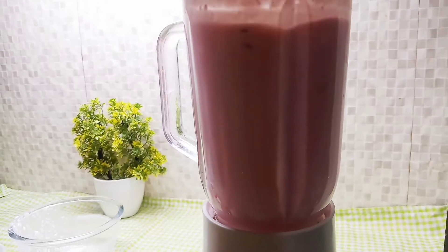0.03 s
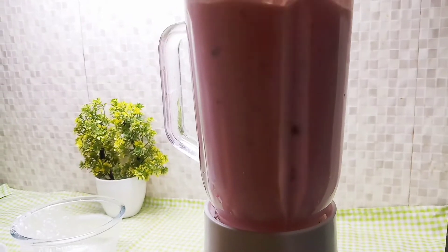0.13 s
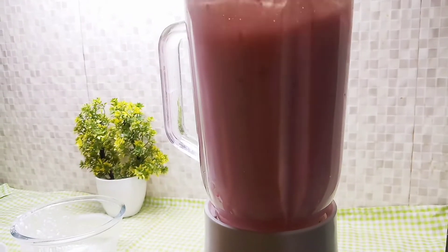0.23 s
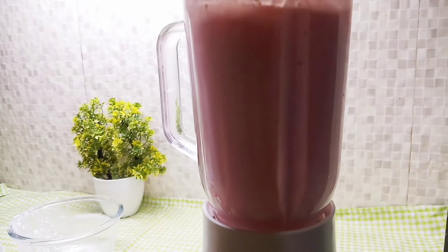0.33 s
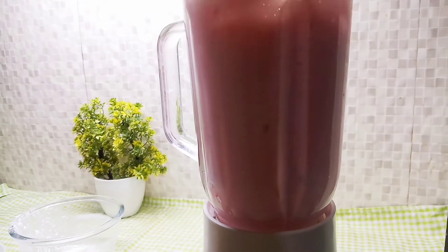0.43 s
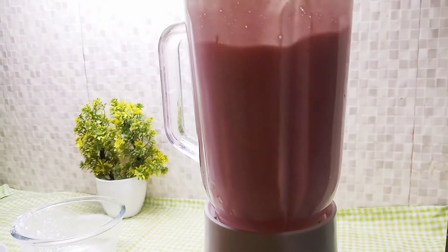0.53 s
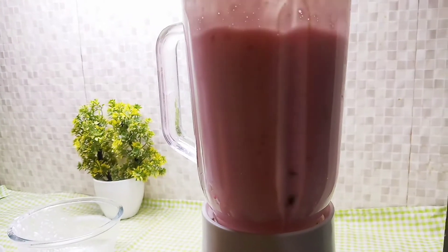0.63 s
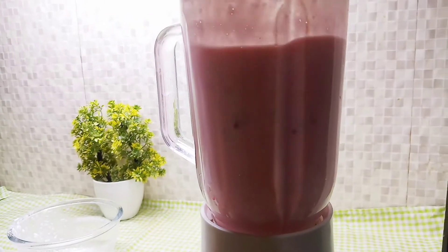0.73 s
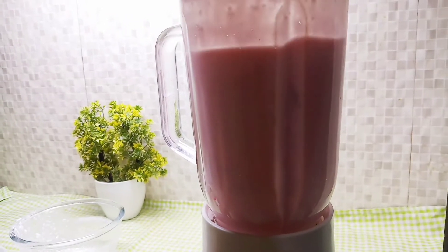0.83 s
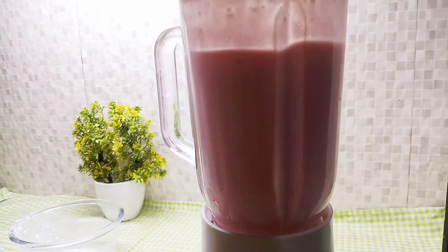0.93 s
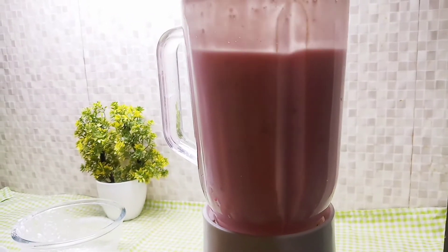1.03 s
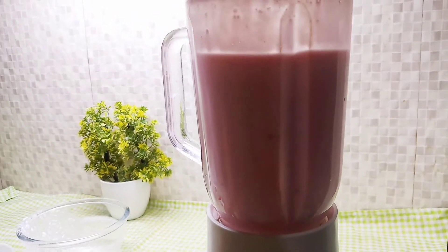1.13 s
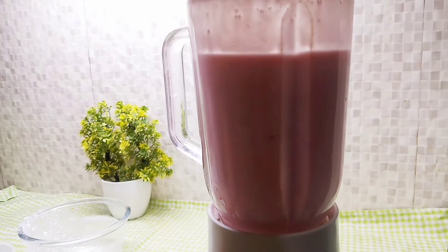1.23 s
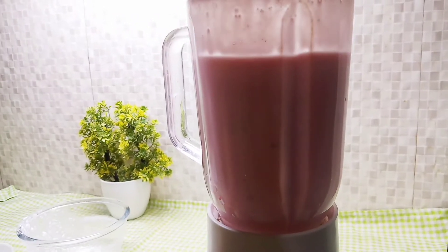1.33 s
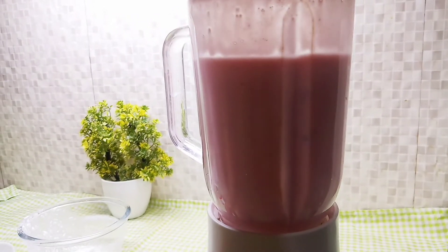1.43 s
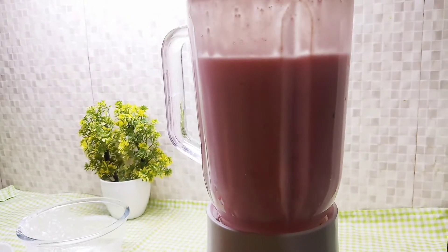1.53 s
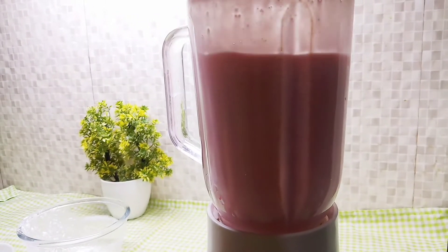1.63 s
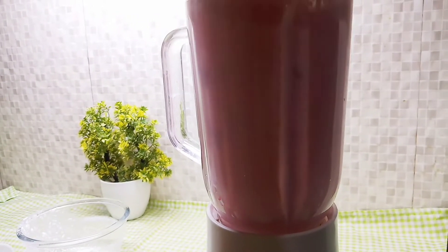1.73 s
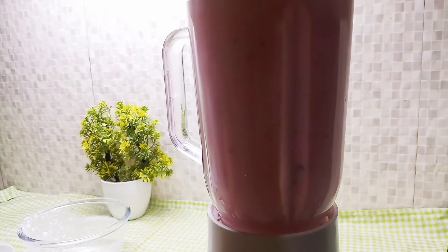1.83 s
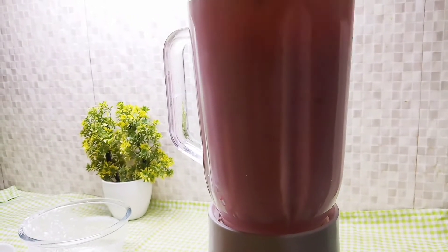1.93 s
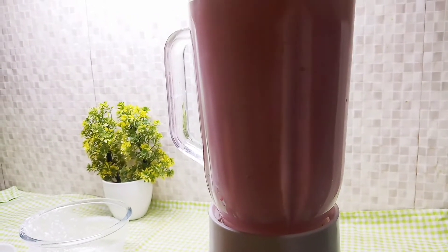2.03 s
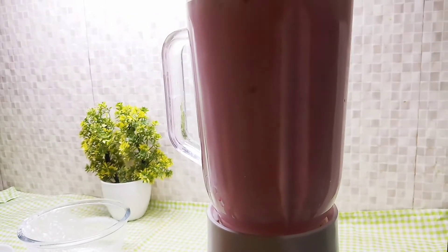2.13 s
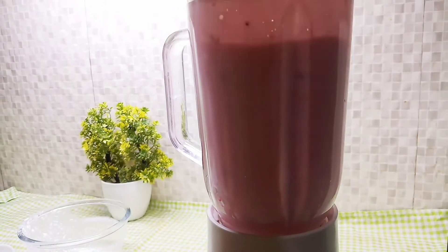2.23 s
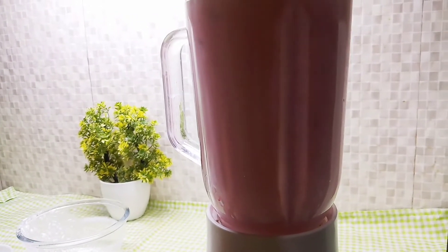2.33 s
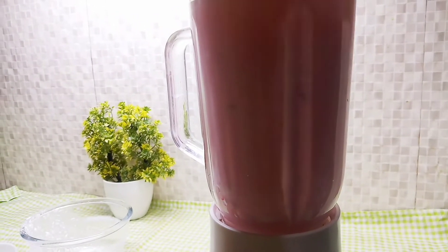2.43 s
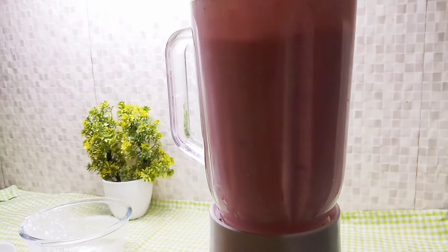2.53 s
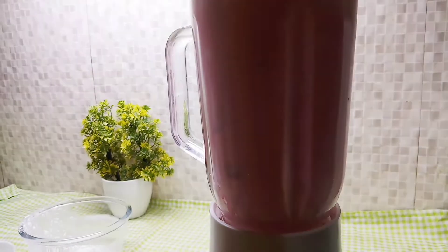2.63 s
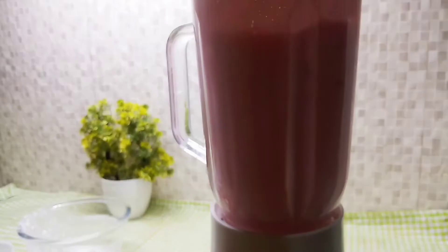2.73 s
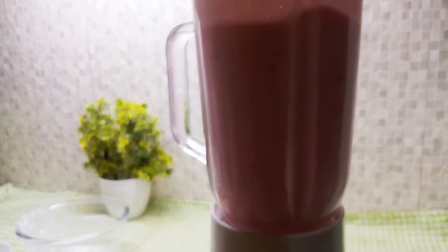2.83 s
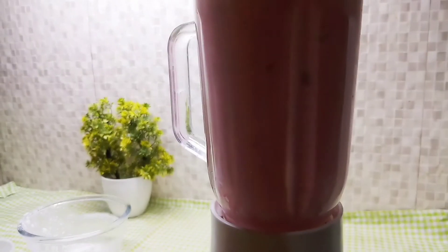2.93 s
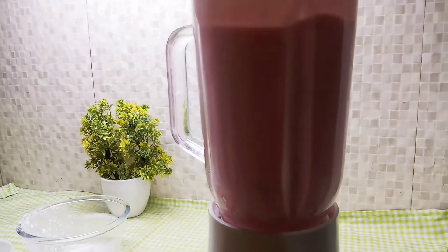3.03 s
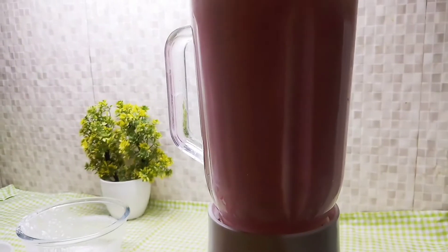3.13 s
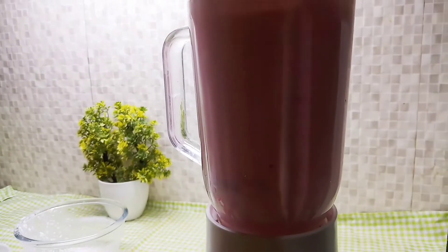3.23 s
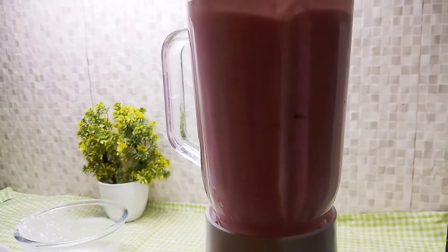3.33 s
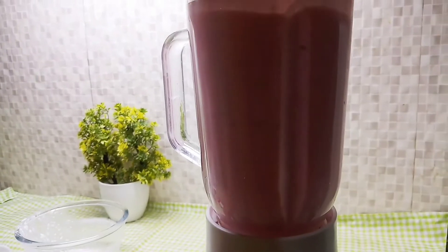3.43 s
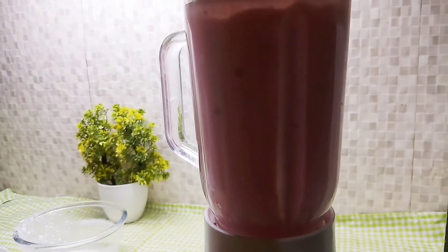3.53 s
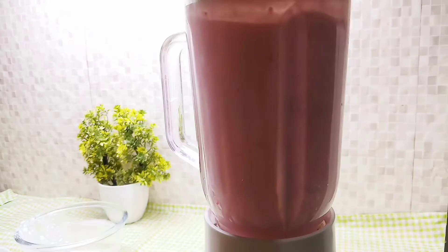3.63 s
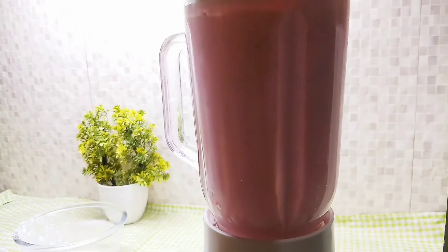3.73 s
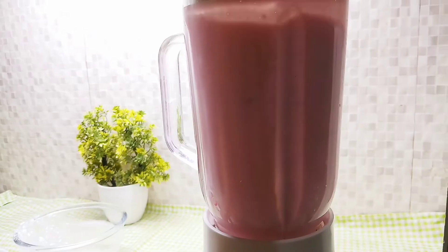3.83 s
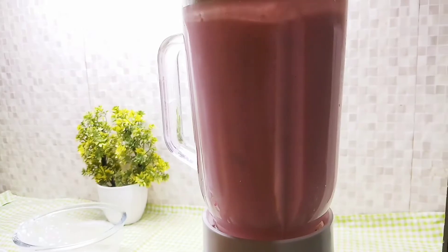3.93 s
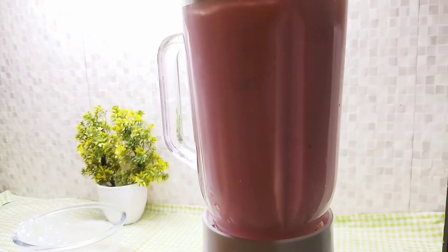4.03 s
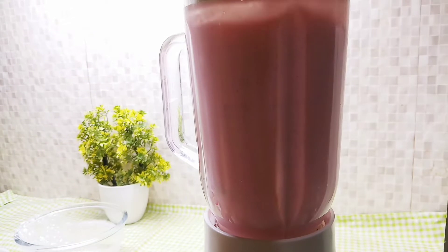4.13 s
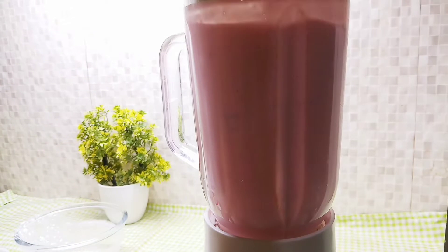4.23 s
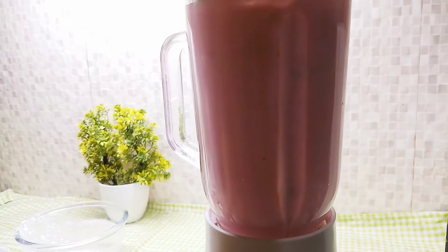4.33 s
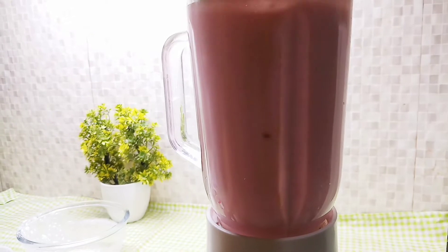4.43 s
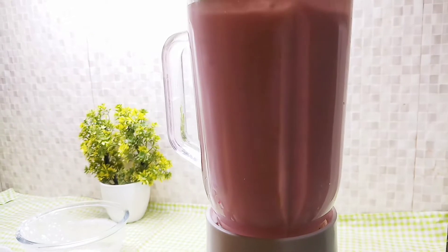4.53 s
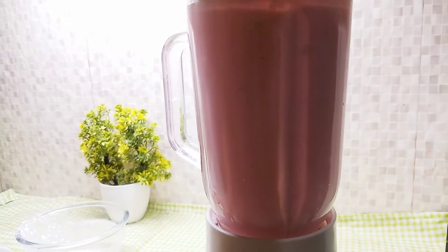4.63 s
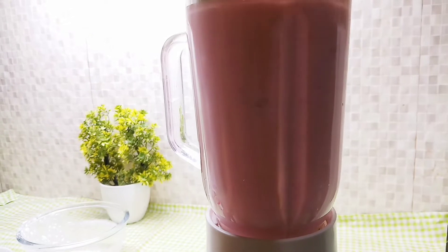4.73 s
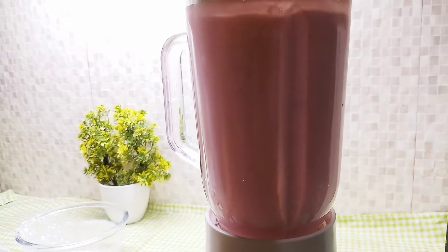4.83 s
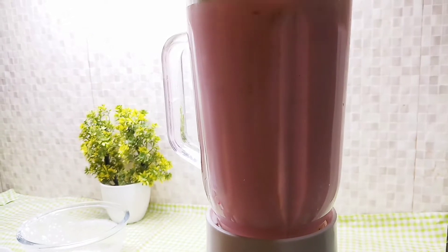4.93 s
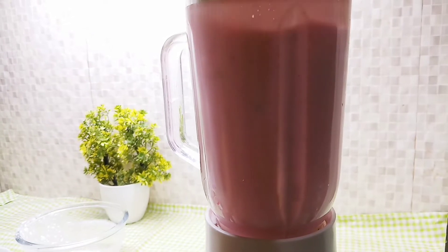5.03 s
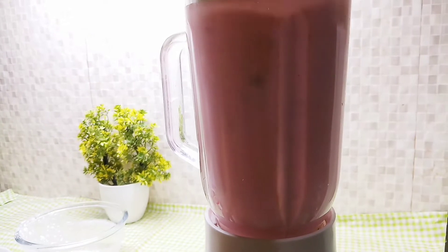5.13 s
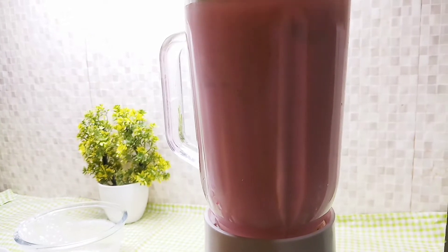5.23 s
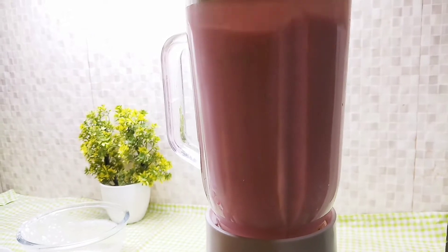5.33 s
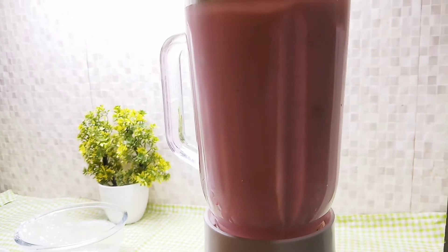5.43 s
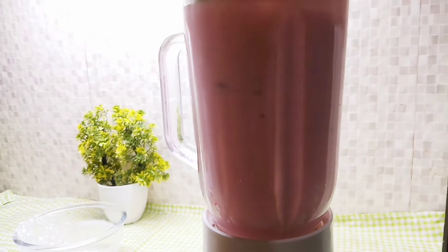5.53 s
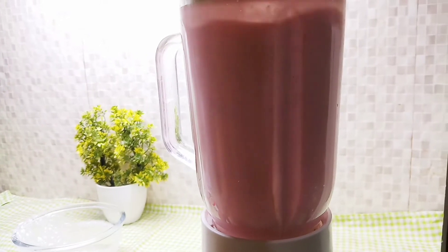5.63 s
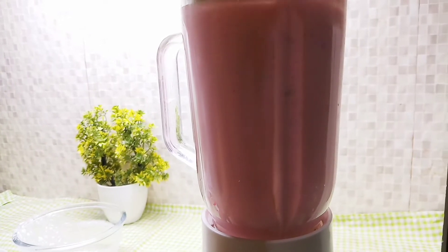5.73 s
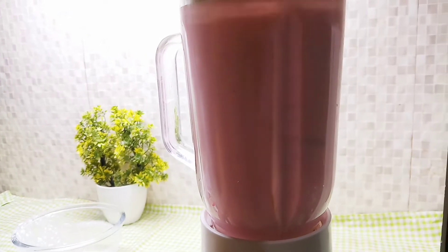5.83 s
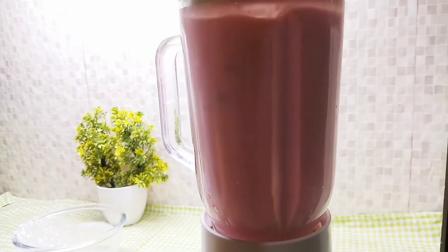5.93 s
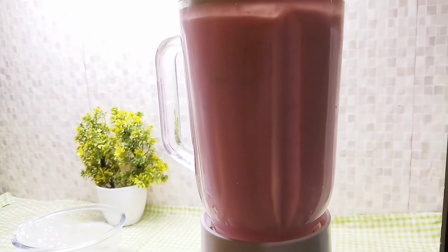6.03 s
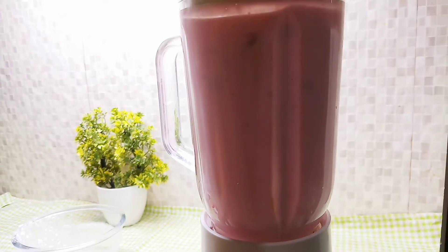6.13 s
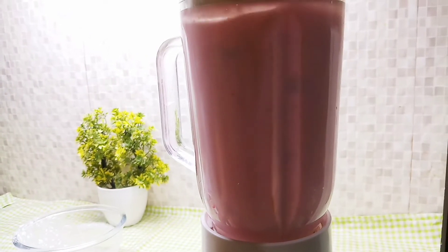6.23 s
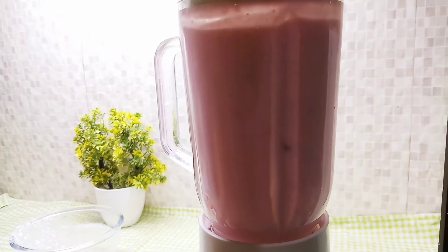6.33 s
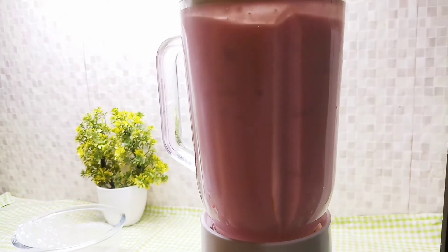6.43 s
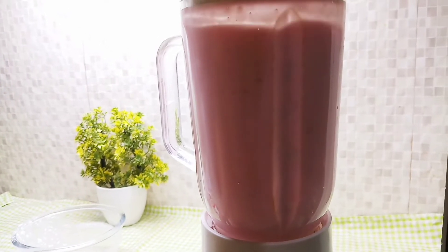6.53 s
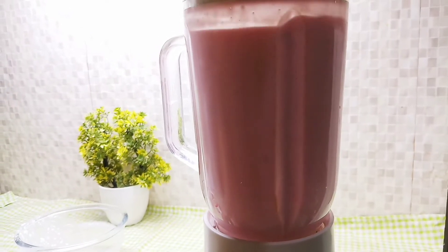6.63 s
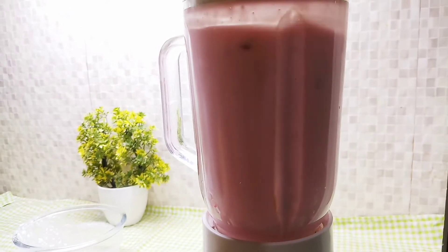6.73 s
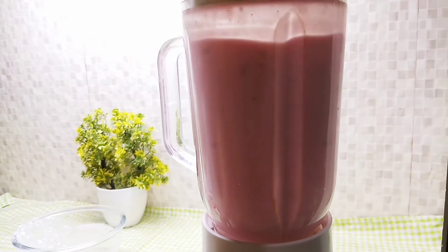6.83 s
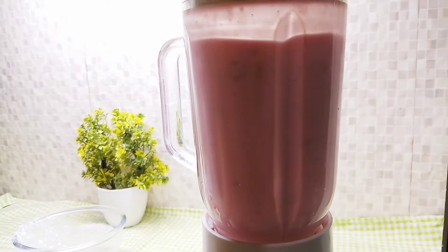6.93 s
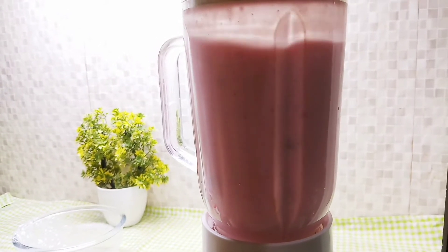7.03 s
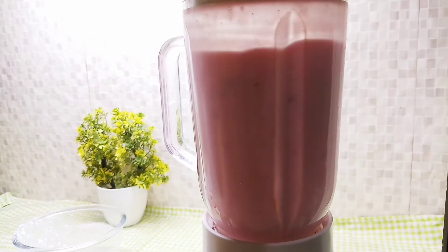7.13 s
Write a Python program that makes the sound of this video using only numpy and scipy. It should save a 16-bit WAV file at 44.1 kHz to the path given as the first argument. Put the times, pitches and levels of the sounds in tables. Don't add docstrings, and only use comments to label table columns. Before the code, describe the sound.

A blender with thick icy mix, heard at close range with short tile echo. Fading slush and knocking ice, small ticks from the slowing drive, then near quiet. A sudden restart heaves the mix, big lumps crack, the motor climbs to a steady whine under dense, gritty roar. Finally power cuts, the whirr sinks and loose ice snaps and rocks the base.

```python
import sys
import numpy as np
from scipy import signal
from scipy.fft import rfft, irfft, next_fast_len
from scipy.io import wavfile

SR = 44100
rng = np.random.default_rng(int(sys.argv[2]) if len(sys.argv) > 2 else 0)


def how_loud(loudness_db):
    steps = np.asarray(loudness_db, float) / 20
    return 10 ** steps


def store_wav(level_fs):
    pcm = np.round(np.clip(np.atleast_2d(level_fs), -1, 1) * 32767)
    wavfile.write(sys.argv[1], SR, pcm.T.astype(np.int16))


N = 316197


def rms_one(x):
    return x / np.sqrt(np.mean(x ** 2) + 1e-20)


def in_time(rows, outside=None):
    s, *columns = np.transpose(rows)
    return [np.interp(np.arange(N) / SR, s, c, outside, outside) for c in columns]


def drift(rate_hz):
    r = np.exp(-2 * np.pi * rate_hz / SR)
    wander = signal.lfilter([1], [1, -2 * r, r * r], rng.standard_normal(N + SR))
    return rms_one(wander[SR:])


def coloured(spectrum, modes=()):
    hz, level_db = np.transpose(spectrum)
    grid = np.maximum(np.arange(4097) * SR / 8192, 1)
    shape_db = np.interp(np.log(grid), np.log(hz), level_db)
    for mode_hz, width_hz, lift_db in modes:
        shape_db = shape_db + lift_db / (1 + (2 * (grid - mode_hz) / width_hz) ** 2)
    cepstrum = irfft(shape_db * np.log(10) / 20)
    cepstrum[1:4096] *= 2
    cepstrum[4097:] = 0
    return irfft(np.exp(rfft(cepstrum)))


def resonant(x, modes, plain_db):
    out = how_loud(plain_db) * x
    for k, (hz, width_hz, level_db) in enumerate(modes):
        r = np.exp(-np.pi * width_hz / SR)
        b = (1 - r * r) / 2 * np.array([1, 0, -1])
        a = [1, -2 * r * np.cos(2 * np.pi * hz / SR), r * r]
        out = out + (-1) ** k * how_loud(level_db) * signal.lfilter(b, a, x)
    return out


def rung_noise(modes):
    once = resonant(rng.standard_normal(N), modes, plain_db=-90)
    return rms_one(resonant(once, modes, plain_db=-90))


# from_hz, to_hz
RANGES_HZ = [
    (25, 400),
    (400, 1500),
    (1500, 8500),
    (8500, 19000),
]


def band(x, k):
    return signal.sosfilt(signal.butter(3, RANGES_HZ[k], "band", fs=SR, output="sos"), x)


# pitch_hz, width_hz, lift_db
JAR_MODES = [(102, 28, 0.5), (145, 14, 5.5), (229, 22, 4), (348, 39, 9.5), (707.4, 114, 10), (881, 23, 9),
             (1146, 140, 6), (1933, 125, 10.5), (2770, 100, 7), (3183, 125, 6.5), (4370, 410, 6),
             (4946, 213, 8.5), (5273, 89, 10), (5470, 59, 9), (5820, 113, 9), (6060, 110, 8),
             (7070, 250, 6.5), (7980, 240, 5), (8580, 120, -5.5), (10120, 360, 5.5)]


def jar(forces, spectrum, ring):
    detune = 0.0092
    lower = coloured(spectrum, np.array(JAR_MODES) * [1 - detune, 1, ring])
    higher = coloured(spectrum, np.array(JAR_MODES) * [1 + detune, 1, ring])
    white = rng.standard_normal((2, N))
    drive = np.zeros(N)
    for k, force in enumerate(forces):
        drive += force * band(white[k % 2], k) / np.linalg.norm(band(lower, k))
    lean = np.pi / 4 * (1 + np.tanh(drift(2.65)))
    low_ring = signal.fftconvolve(drive * np.cos(lean), lower)
    high_ring = signal.fftconvolve(drive * np.sin(lean), higher)
    return (low_ring + high_ring)[:N]


def chips(per_s, spread_db, t60):
    sizes = how_loud(spread_db * np.minimum(rng.exponential(1, N), 3))
    struck = rng.random(N) < per_s / SR
    return rms_one(signal.lfilter([1], [1, -how_loud(-60 / (t60 * SR))], sizes * struck))


FULL_CHURN_DB = -20


def follower(churn_db, full_db, below, above, heave_db, shudder_db):
    heave, = in_time([(1.265, 0), (1.28, 1), (1.593, 1), (1.623, 0)])
    shudder = np.exp(-((np.arange(N) / SR - 6.75) / 0.34) ** 2)
    excess_db = churn_db - FULL_CHURN_DB
    follow_db = np.where(excess_db < 0, below, above) * excess_db
    return full_db + follow_db + heave_db * heave + shudder_db * shudder


# time_s, level_db
CHURN = [(0, -33), (.51, -49.5), (.754, -52), (1.0, -68), (1.266, -76), (1.275, -31), (1.34, -22.5),
         (1.4, -17), (1.47, -16.5), (1.514, -21.5), (1.6, -17.5), (1.64, -20), (1.77, -19), (5.66, -16.5),
         (5.86, -15), (5.96, -18.5), (6.484, -29.5), (7.17, -42.5)]
# full_churn_db, db_per_db_below, db_per_db_above, heave_db, shudder_db
RUMBLE = (-41, 0.7, -0.05, 12, 10.5)
SLOSH = (-28.5, 0.84, 0, -1, 1.5)
SPRAY = (-30.5, 1.3, 0.62, -3, -8)
# pitch_hz, level_db (per Hz)
POWERED_COLOUR = [(30, -37), (100, -10), (200, -13.5), (470, -8.5), (1400, -5.5), (2100, -5.5),
                  (3700, -8.5), (5400, -2), (6200, -4), (6500, -8), (8800, -15.5), (9400, -24),
                  (12000, -31.5), (16500, -43)]
COASTING_COLOUR = [(30, -33), (100, -6.5), (300, -9), (470, -11), (1400, -8.5), (2100, -9.5), (5400, -5),
                   (8800, -13.5), (9400, -31), (16500, -36)]


def slush():
    scour_db, = in_time(CHURN)
    rumble_db, slosh_db, spray_db = (follower(scour_db, *layer) for layer in (RUMBLE, SLOSH, SPRAY))
    hail = chips(per_s=220, spread_db=5.5, t60=0.012)
    splinters = chips(per_s=80, spread_db=3.5, t60=0.012)
    slowing, = in_time([(1.26, 1.5), (1.28, 2.06), (5.9, 0.23), (6.4, 2)])
    splinters = splinters * slowing
    surge = drift(6.5)
    rumble = how_loud(rumble_db + 0.44 * drift(13))
    slosh = how_loud(slosh_db + 0.2 * surge + 1.7 * drift(6.1)) * (0.79 + 0.074 * hail)
    scour = how_loud(scour_db + 0.52 * surge) * (0.62 + 0.11 * hail + 0.042 * splinters)
    spray = how_loud(spray_db + surge / 2) * (0.71 + 0.12 * hail + 0.27 * splinters)
    forces = np.array([rumble, slosh, scour, spray])
    driven, = in_time([(1.26, 0), (1.27, 1), (6.0, 1), (6.5, 0)])
    powered = jar(forces * np.sqrt(driven), POWERED_COLOUR, ring=0.91)
    coasting = jar(forces * np.sqrt(1 - driven), COASTING_COLOUR, ring=0.45)
    return powered + coasting


# pitch_hz, width_hz, level_db
ROCKING_MODE = (147.5, 22, 0)


def rocking():
    coasting, = in_time([(.98, 1), (1.08, .2), (1.28, 0), (6.2, 0), (6.4, 1)])
    churn_db, = in_time(CHURN)
    sway = rung_noise([ROCKING_MODE])
    level_db = -49 + 0.5 * (churn_db - FULL_CHURN_DB) + 3.4 * drift(5)
    return coasting * how_loud(level_db) * sway


# start_s, peak_db, low_part_db, high_part_db
COAST_LUMPS = [(0.0308, -13.5, -19, -44), (0.052, -23, -6, -17), (0.122, -10, -14, -25.5),
               (0.163, -22, -19, -25), (0.2003, -15.5, -12, -23), (0.24, -24, -15, -32),
               (0.261, -21, -13, -21.5), (0.2924, -14.5, -15, -28), (0.359, -23, -13, -21),
               (0.399, -26.5, -4.5, -24), (0.4273, -25.5, -7, -38), (0.4843, -49, -16, -27),
               (0.526, -15, -13.5, -22), (0.5511, -18, -13, -24), (0.61, -27, -6, -24),
               (0.6567, -16, -14.5, -26), (0.7026, -26, -6, -19), (0.7615, -34, -25, -19),
               (0.815, -44, -24, -9), (0.85, -42, -15, -12), (0.9134, -28.5, -12.5, -29),
               (0.941, -35, -22, -35), (1.064, -50, -30, -34), (1.101, -52, -23, -39),
               (1.1598, -40, -42, -36), (1.196, -50, -32, -32), (1.216, -40, -43, -34),
               (1.27, -25, -16, -22)]
LAST_LUMPS = [(6, -5, -14, -23), (6.0625, 3, -19.5, -23.5), (6.164, -10, -8, -34), (6.223, -7.5, -13, -33),
              (6.2888, -10, -41, -22), (6.3475, -5.5, -18.5, -27), (6.39, -15, -2.5, -31),
              (6.449, -11.5, -9, -35), (6.468, -10.5, -9.5, -22), (6.509, -6.5, -24, -27),
              (6.549, -14, -14, -32), (6.579, -27, -23, -36), (6.608, -16, -21, -30),
              (6.6206, -8.5, -32, -37), (6.6394, -11.5, -10, -35), (6.6883, -15, -30, -26),
              (6.7226, -19, -11, -34), (6.753, -16, -26, -32), (6.7799, -16, -30, -39.5),
              (6.841, -12.5, -19, -34), (6.8558, -9, -21, -36), (6.8745, -9.5, -9, -31),
              (6.929, -19.5, -11, -36), (6.965, -22, -13, -39), (7.0285, -26, -28, -42),
              (7.0613, -43, -13, -44), (7.0885, -37, -21, -39), (7.1052, -13, -7.5, -48)]
# start_s, peak_db, low_part_db
START_LUMPS = [(1.273, -31, -18), (1.2894, -11.5, -8), (1.304, -6, -11), (1.3313, -6, -12),
               (1.363, -0.5, -14), (1.406, -3, -6.5), (1.448, -1.5, -12), (1.476, 1.5, -15),
               (1.504, 1, -32), (1.5293, 1, -14), (1.642, -1, -17), (1.6669, -5, -27), (1.687, 0, -27),
               (1.7178, 2, -17), (1.747, 3, -13), (1.854, 0, -18), (2.05, 2, -17), (2.0746, 5.5, -16.5),
               (2.11, 1, -14), (2.2656, 3.5, -19.5), (2.351, -0.5, -14), (2.374, 3, -18), (2.537, -1, -21)]
RUN_LUMPS = [(2.6567, 2.5, -13.5), (2.752, 5, -17), (2.794, 1, -13.5), (2.866, 2.5, -37), (2.896, 5, -18),
             (3.028, 4.5, -25), (3.0845, 1, -29), (3.1097, 6.5, -19), (3.215, 4.5, -40), (3.405, -2, -14),
             (3.597, 1.5, -36), (3.627, -1, -27), (3.748, 4.5, -20), (3.813, -1, -19), (3.95, -2, -28),
             (4.087, -13, -36), (4.1054, 2.5, -42), (4.209, 2, -35), (4.2342, 3, -13.5), (4.393, -4, -12),
             (4.688, 4.5, -11), (5.08, 7, -29), (5.2006, -10, -29), (5.2183, 1, -24), (5.239, -13, -25),
             (5.2952, -3, -30), (5.5177, -8, -29), (5.602, 3.5, -8.5), (5.7124, -8.5, -1),
             (5.7754, 0.5, -16)]
BRITTLE_S = [1.3032, 1.4047, 1.6669, 1.688, 2.752, 2.7944, 3.747, 3.95, 4.3944, 4.689]
# start_s, peak_db
COAST_PIECES = [(.0196, -21), (.1088, -24), (.1934, -23), (.2785, -18), (.3094, -22), (.371, -19),
                (.414, -27), (.436, -28), (.4464, -28), (.514, -29), (.5374, -21), (.558, -23), (.671, -23),
                (.687, -28), (.86, -42), (.9797, -48), (6.285, -11), (6.2944, -9), (6.408, -13),
                (6.4234, -17), (6.476, -13), (6.521, -14), (6.535, -17), (6.564, -16), (6.5917, -20),
                (6.6544, -18), (6.6983, -13), (6.7414, -21), (6.76, -19), (6.7944, -23), (6.8621, -16),
                (6.88, -16)]
START_PIECES = [(1.3184, -5), (1.344, -6), (1.3724, -3), (1.383, -1), (1.3924, -8), (1.4154, -5),
                (1.4214, -5), (1.4424, -6), (1.464, -4), (1.487, 0), (1.5378, 1), (1.555, -2),
                (1.5754, -1.5), (1.5984, -1), (1.6094, -12)]
RUN_PIECES = [(1.833, 6), (2.2114, -14), (2.2444, -7), (2.307, 5), (2.5905, -5), (2.9974, -3), (3.2585, 0),
              (3.278, 6), (3.3254, -13), (3.4724, -8), (3.5064, -8), (3.7004, -17), (3.7324, -13),
              (3.8324, -12), (4.1594, -16), (4.2464, 1), (4.3604, -12), (4.4774, -7), (4.6404, -10),
              (4.9382, -16), (4.9606, -16), (4.9974, -2), (5.1194, 1), (5.3374, -8), (5.3844, -14),
              (5.4234, -17), (5.4714, -15), (5.7244, -5), (5.8114, 7)]
PIECE_DB = (-1.5, -0.5, -6)
PIECE_HIGH_DB = (-29, -26, -29)
# time_s, rise_s, t60_s
CRUNCH = [
    (1.26, .0003, 0.046),
    (1.3, 0.002, 0.065),
    (1.6, 0.0033, 0.046),
    (5.9, 0.0072, 0.045),
    (6.3, .0006, 0.036),
]
# pitch_hz, level_db (per Hz)
ICE_COLOUR = [(60, -21.5), (230, 9.5), (480, -8.5), (700, -2), (2900, -5.5), (5000, -4), (6400, -5),
              (8900, -5.5), (9600, -15), (12000, -19.5), (14600, -26), (16500, -28)]


def lumps():
    forces = np.zeros((4, N))
    grind, decay = in_time(CRUNCH)
    powered = []
    for s, peak_db, low_db in START_LUMPS + RUN_LUMPS:
        brittle = np.isclose(BRITTLE_S, s, atol=1 / 200).any()
        powered.append((s, peak_db, low_db, rng.normal(-31, 3.5) + 7.5 * brittle))
    pieces = []
    for k, table in enumerate([COAST_PIECES, START_PIECES, RUN_PIECES]):
        pieces += [(s, peak_db + PIECE_DB[k], -19, PIECE_HIGH_DB[k]) for s, peak_db in table]
    for s, peak_db, low_db, high_db in COAST_LUMPS + powered + LAST_LUMPS + pieces:
        i = round(s * SR)
        t60 = decay[i]
        t = np.arange(min(round(1.5 * t60 * SR), N - i)) / SR
        level_db = peak_db + np.array([low_db - 14.0, low_db - 3.0, -8, high_db + 7.5])
        rise = 1 - np.exp(-t / (grind[i] + np.array([[.004], [.001], [.0001], [.0001]])))
        fall = how_loud(-60 * t / (t60 * np.array([[1.5], [1.2], [.95], [.7]])))
        fall *= 1 + 0.6 * how_loud(-60 * t / 0.007)
        forces[:, i:i + len(t)] += how_loud(level_db)[:, None] * rise * fall
    return jar(forces, ICE_COLOUR, ring=0.92)


# start_s, peak_db
TICKS = [(0.2786, -29), (0.3174, -26), (0.4836, -34), (0.687, -32), (0.7294, -36), (0.7607, -38),
         (0.815, -33), (0.85, -41), (0.878, -43), (0.9393, -26), (1.027, -44), (1.064, -55), (1.1019, -45),
         (1.131, -55), (1.161, -33), (1.1952, -42)]
# pitch_hz, width_hz, level_db
BLADE_HUB = [(1520, 120, -20), (3330, 310, 5), (8800, 230, 0), (11450, 486, -15), (14600, 900, -24)]


def coupling():
    loose, = in_time([(.7, 0), (.8, 1), (1.25, 0.61), (1.27, .4), (1.3, 0)])
    rattle = how_loud(-60) * chips(per_s=55, spread_db=7, t60=0.02) * loose
    touch = np.zeros(N)
    for s, peak_db in TICKS:
        i = round(s * SR)
        touch[i:i + 800] += how_loud(peak_db + 4 - 60 * np.arange(800) / SR / 0.019)
    noise = rng.standard_normal(N)
    shrill_db, = in_time([(.9, 3.0), (.97, -13)])
    shrill = how_loud(shrill_db) * touch * noise
    dull_ring = resonant((touch + rattle) * noise, BLADE_HUB[:2], plain_db=-40)
    return dull_ring + resonant(shrill, BLADE_HUB[2:], plain_db=-40)


# start_s, housing_ring_db, length_s
JOLTS = [
    (1.353, -19, 0.066),
    (1.4, -21, .1),
    (1.469, -17, 0.18),
    (2.757, -18, 0.061),
    (5.09, -21, 0.036),
    (5.222, -23, 0.029),
    (1.72, -17, 0.27),
    (2.894, -13.5, 0.1),
    (3.11, -13, 0.031),
    (4.231, -18, 0.069),
]


def strain():
    pulling, = in_time([(1.28, 0), (1.32, 1), (6.1, 1), (6.3, 0)])
    force = how_loud(-34) * pulling
    for s, peak_db, length in JOLTS:
        jolt_db, = in_time([(s - 0.031, peak_db - 24), (s, peak_db), (s + length, peak_db - 24)], -120)
        force = force + how_loud(jolt_db)
    return force


# start_s, peak_db
THUMPS = [(.6, -38), (.92, -43), (1.299, -18), (1.385, -25), (1.49, -12), (1.531, -24), (1.807, -35),
          (1.943, -39), (3.824, -23), (4.016, -40), (4.389, -15), (6.51, -31), (6.803, -23.5), (6.88, -29),
          (6.95, -28), (7.015, -25)]
# pitch_hz, width_hz, level_db
BASE_MODES = [(97, 6.3, -16), (150, 27, 3), (249, 19, 8), (275, 29, -2.5)]
# pitch_hz, width_hz, level_db
HOUSING_MODES = [(700, 53, -5.5), (1926, 167, 0)]
# time_s, level_db
GROAN = [(1.29, -58), (1.33, -21), (1.38, -30), (1.44, -28), (1.47, -21.5), (1.53, -26.5), (1.58, -32),
         (1.62, -60)]


def housing():
    shake = strain() * how_loud(3 * drift(10)) * rng.standard_normal(N)
    ringing = resonant(resonant(shake, HOUSING_MODES, plain_db=-90), HOUSING_MODES, plain_db=-90)
    push = np.zeros(N)
    for s, peak_db in THUMPS:
        push[round(s * SR)] = how_loud(peak_db + 38.0)
    push = signal.lfilter([.05], [1, -.95], push)
    thumps = resonant(push, BASE_MODES, plain_db=-40)
    groan_db, = in_time(GROAN, -120)
    groan = how_loud(groan_db) * rung_noise(HOUSING_MODES[:1])
    return groan + how_loud(19.0) * ringing + thumps


# time_s, pitch_hz (turns per s), level_db
ROTOR = [
    [(1.35, 105, -50), (1.42, 112, -39), (1.465, 119, -25), (1.51, 125, -37), (1.58, 136, -42),
     (1.64, 144, -34), (1.71, 150, -44), (1.84, 166, -39), (1.91, 174, -48), (1.95, 178, -44)],
    [(5.88, 181, -44), (5.94, 166, -48), (5.99, 159, -38), (6.03, 150, -39), (6.086, 143, -28),
     (6.16, 126, -39), (6.22, 118, -48), (6.3, 108, -62)],
]
# time_s, pitch_hz
BARS = [(1.96, 2128), (2.29, 2152), (2.62, 2158), (3.06, 2124), (3.4, 2150), (3.83, 2146), (4.03, 2179),
        (4.38, 2147), (4.82, 2172), (5.28, 2161), (5.5, 2184), (5.86, 2180)]
# pitch_hz, width_hz, level_db
SQUEAL_MODE = (15000, 260, 0)


def sine(hz):
    return np.sqrt(2) * np.sin(2 * np.pi * np.cumsum(hz) / SR)


def motor():
    mains_hz = 100
    bars_hz, = in_time(BARS)
    turns_hz, glide_db = in_time(sum(ROTOR, []))
    spinning, = in_time([(1.33, 0), (1.4, 1), (6.3, 1), (6.4, 0)])
    powered, = in_time([(1.27, 0), (1.3, 1), (5.88, 1), (5.92, 0)])
    at_speed, = in_time([(1.93, 0), (1.97, 1), (5.86, 1), (5.9, 0)])
    turns_hz = turns_hz + at_speed * (bars_hz / 12 - turns_hz)
    tone_db = glide_db + at_speed * (-42.5 - glide_db) + drift(6)
    out = spinning * how_loud(tone_db) * sine(turns_hz)
    out += powered * how_loud(-69 + 1.7 * drift(4)) * sine(np.full(N, mains_hz))
    out += at_speed * how_loud(-36.5 + 2 * drift(2.3)) * sine(bars_hz + mains_hz)
    out += at_speed * how_loud(-40 + 3 * drift(2.5)) * sine(bars_hz)
    squeal = at_speed * how_loud(-58 + 3 * drift(12)) * sine(7 * bars_hz + 20 * drift(25))
    return out + resonant(squeal, [SQUEAL_MODE], plain_db=-90)


def kitchen(x):
    t60_s, wall_cut_hz = 0.19, 2600
    size = next_fast_len(N + SR)
    hz = np.arange(size // 2 + 1) * SR / size
    response = 0
    for k, lag in enumerate(rng.uniform(.012, .035, 8)):
        wall = how_loud(-60 * lag / t60_s) / (1 + 1j * hz / wall_cut_hz) ** 0.44
        loop = wall * np.exp(-2j * np.pi * hz * lag)
        response = response + (-1) ** k * loop / (1 - loop)
    return irfft(rfft(x, size) * response, size)[:N]


# pitch_hz, level_db (per Hz)
ROOM_TONE = [(18, -58), (30, -18), (96, 17), (150, 4), (300, -14), (500, -44), (2500, -48), (3250, -49),
             (5500, -120)]


def scene():
    blender = slush() + rocking() + lumps() + coupling() + housing() + motor()
    hush = signal.fftconvolve(rng.standard_normal(N), coloured(ROOM_TONE))[:N]
    mono = blender + how_loud(-12.5) * kitchen(blender) + how_loud(-61.5) * rms_one(hush)
    return np.array([mono, mono])


def band_limit(x):
    return signal.sosfilt(signal.butter(12, 16330, fs=SR, output="sos"), x)


def record(dry):
    ceiling = .87
    rounded = ceiling * np.tanh((np.abs(dry) / ceiling) ** 2.5) ** .4 * np.sign(dry)
    top_cut = signal.ellip(12, .3, 60, 15730, fs=SR, output="sos")
    low_cut = signal.butter(2, 42, "high", fs=SR, output="sos")
    mix = signal.sosfilt(low_cut, signal.sosfilt(top_cut, rounded))
    return band_limit(mix)


dry = scene()
out = record(dry)
store_wav(out)
```